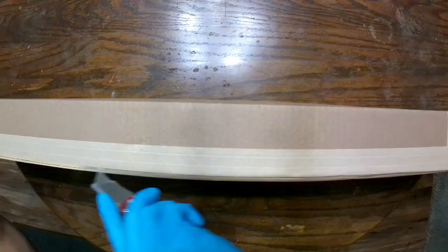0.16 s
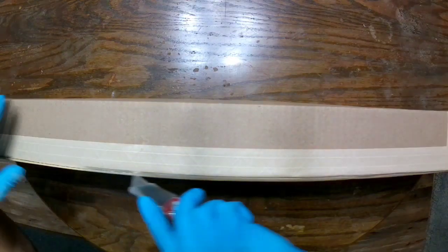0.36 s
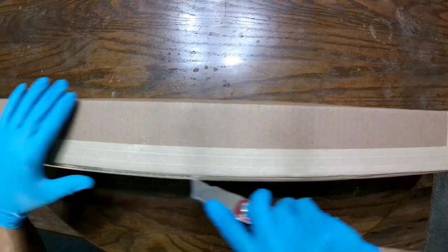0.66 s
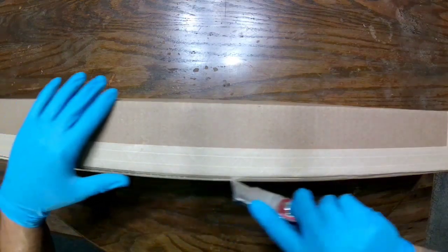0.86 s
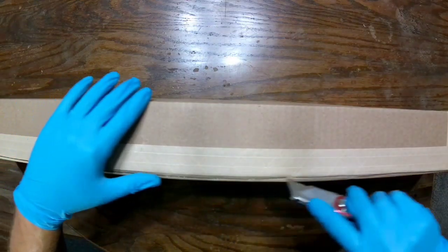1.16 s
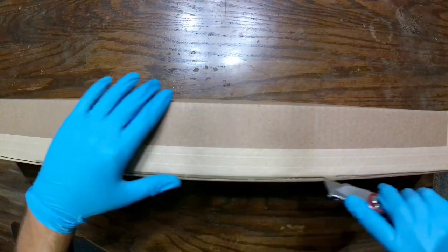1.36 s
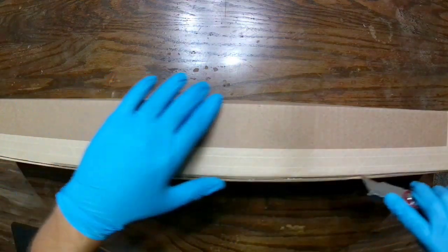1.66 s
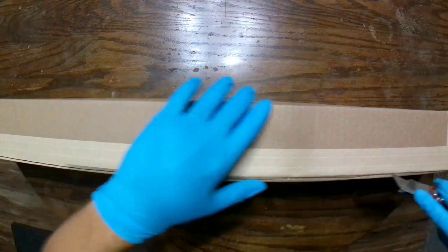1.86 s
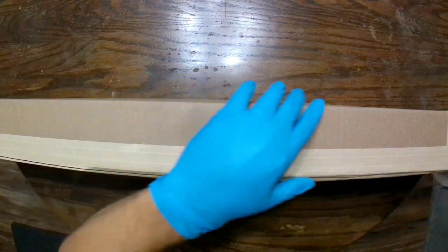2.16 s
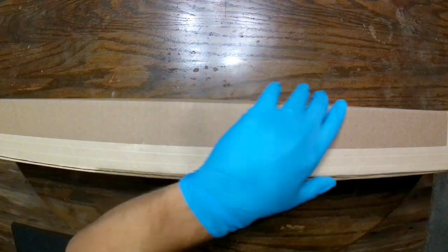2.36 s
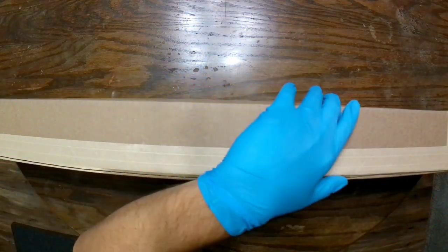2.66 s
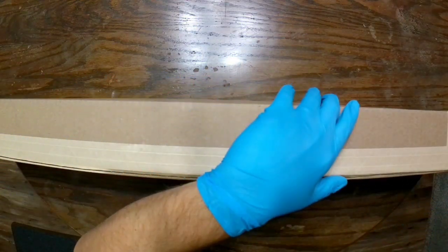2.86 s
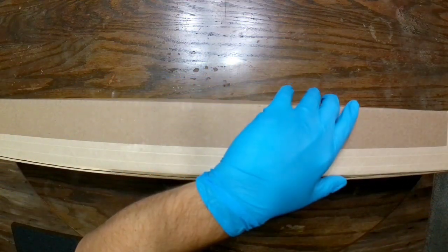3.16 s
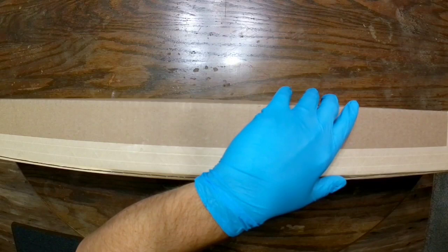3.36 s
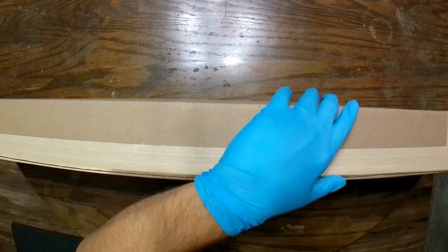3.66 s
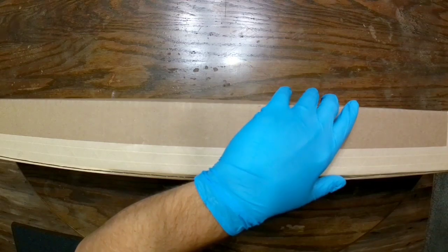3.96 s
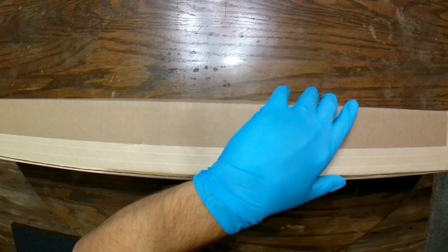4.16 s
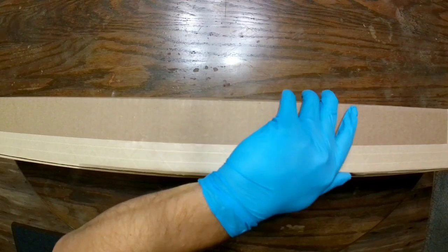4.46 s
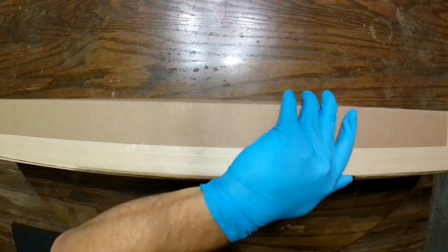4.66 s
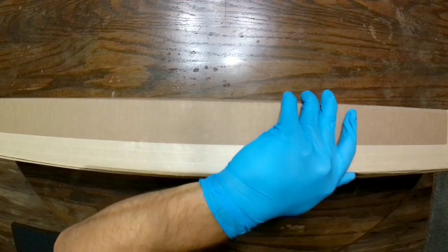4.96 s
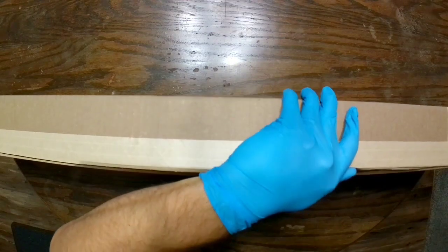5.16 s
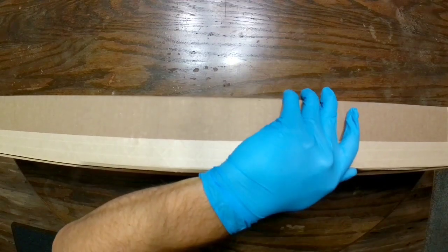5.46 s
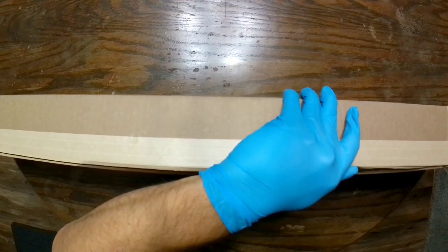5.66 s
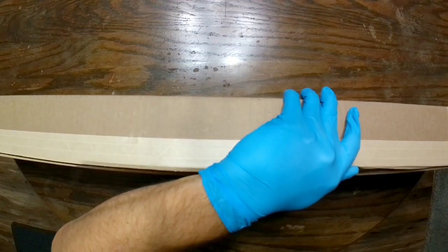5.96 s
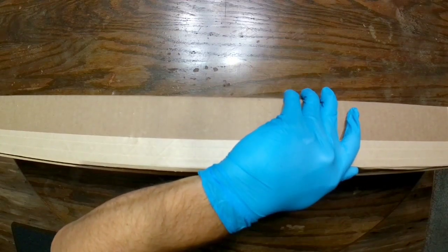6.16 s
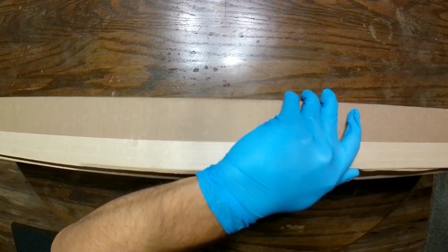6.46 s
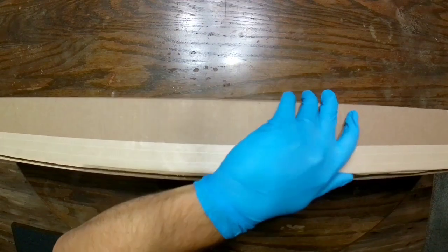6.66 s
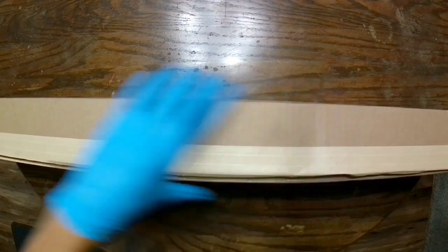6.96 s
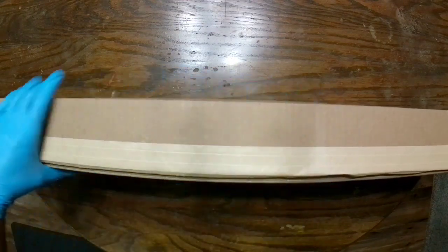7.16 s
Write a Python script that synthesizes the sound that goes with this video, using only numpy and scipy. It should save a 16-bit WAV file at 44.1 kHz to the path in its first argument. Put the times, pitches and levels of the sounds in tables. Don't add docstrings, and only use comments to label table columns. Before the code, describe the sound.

Close, gritty cardboard cutting with crackling tears for four seconds, then near quiet, two hard hollow box thumps and a short stuttering scrape on wood.

```python
import sys
import numpy as np
from scipy import signal
from scipy.fft import rfft, irfft, next_fast_len
from scipy.io import wavfile

SR = 44100
rng = np.random.default_rng(int(sys.argv[2]) if len(sys.argv) > 2 else 0)


def convert_level_to_amplitude(level_db):
    exponent = np.asarray(level_db, float) / 20
    return 10 ** exponent


def store_pcm(level_fs):
    pcm = np.round(np.clip(level_fs, -1, 1) * 32767).astype(np.int16)
    wavfile.write(sys.argv[1], SR, np.atleast_2d(pcm).T)


N = 321930

# (f/Hz, level/dB per Hz)
AIR_SPECTRUM = [(12, -42), (20, -2), (22, -24.5), (27, -22), (53, -17.5), (70, -18.5), (1120, -37.5),
                (1480, -41.5), (1910, -45.5), (2320, -49.5), (3340, -46.5), (4060, -47), (7310, -49.5),
                (14700, -53), (16000, -57)]
# (f/Hz, width/Hz, level/dB)
FAN_MODES = [(1540, 150, 0)]
# (f/Hz, t60/s)
ROOM_DECAY = [(100, 0.26), (500, 0.22), (1500, 0.31), (4000, 0.37), (10000, 0.22)]

PANEL_MODES = [(139.7, 19, 0.5), (209.5, 30.3, 1), (333.7, 33, -3), (385.7, 30.4, 0), (436, 51.6, 0.5),
               (551.5, 138, 2.5), (620, 184, -1)]
WALL_MODES = [(638, 37, -6), (724, 140, 4.5), (897, 124, 4), (1062, 108, 2), (1171, 154, 0),
              (1355, 185, -1), (1618, 287, 0), (1760, 717, -7)]
PAPER_MODES = [(2510, 470, 8), (3593, 210, 6.5), (5380, 1630, 10), (7600, 1200, -15.5), (9800, 1100, 3.5),
               (14260, 2400, -18)]
TABLE_MODES = [(60, 16, 0.0048), (90, 30, 0.021)]
THUD_MODES = [(430, 330, -1), (1000, 470, -6)]
SEAM_MODES = [(1580, 220, 6.5), (2585, 260, 7), (3950, 280, 2), (5870, 700, 1)]
FACE_MODES = [(1900, 490, 5.5), (3120, 1100, 1.5), (5230, 620, 3), (9900, 3100, -11.5)]
SOLE_MODES = [(990, 147, 5), (1246, 304, 0.5)]
KNIFE_MODES = [(1620, 320, 10.5), (1960, 950, 2.5), (3670, 150, 1), (5750, 300, -8), (9700, 530, -14)]
# (f/Hz, level/dB)
SKIN_RADIATION = [(8000, 0.5), (11200, -2.5), (11900, -19), (15000, -15)]

# (t/s, hiss peak level/dB, panel level/dB, relative wall level/dB)
CATCHES = [(.196, -29, -2, 5), (.2436, -26.5, -11, 0.5), (.2777, -33, -1, -10), (.3327, -23.5, -1.5, 2.5),
           (.3863, -24, 0.5, -1), (.417, -28, -7, 0), (.498, -24, -13, -4.5), (.5328, -25, -5, -10),
           (.616, -27, -3, -20), (.6808, -20, -8, -10), (.7086, -23.5, -1, -18), (.849, -28.5, -1, -5),
           (.888, -29.5, -4.5, -17), (1.0638, -26.5, -11, 6), (1.1872, -31, -12, 6), (1.2226, -30.5, 0, 0),
           (1.2481, -19.5, -5, -3), (1.2921, -23, -0.5, -7), (1.7938, -19.5, 0.8, -7),
           (1.8501, -22.5, -3, 5.5), (2.173, -28.5, -23, 10.5), (2.2741, -26, -33, -11),
           (2.2918, -20, -12, -21), (2.3472, -28, -20, -13), (2.3876, -20, -11, 1),
           (2.4649, -22.5, -5.5, -10), (2.6485, -25.5, -0.5, -15), (2.7536, -30.5, -3.5, -16),
           (2.9307, -29.5, 0.5, -12), (3.1643, -22, -2.5, -1)]
# (t/s, hiss peak level/dB, panel level/dB, relative
# wall level/dB)
TICKS = [(1.533, -42, 12.5, -19), (1.7204, -57, -7, 35), (2.14, -37, 6, 8), (2.3065, -32.5, -17, 4.5),
         (2.4047, -30, -7, -1), (2.7066, -30, -7, -24), (2.7302, -31.5, -1, -8), (2.886, -36.5, 0, -12),
         (3.054, -65, 22, -6), (3.1548, -30.5, -20, 0), (3.3836, -45.5, 5, 12), (3.4559, -36, 5.5, 3.5),
         (3.606, -52, 12.5, 20), (3.7533, -35.5, -6, 9), (3.8487, -36, 4.5, 10), (3.984, -39, -5, -4),
         (4.0093, -26, 5.5, 10.5), (4.014, -24, 1.5, -8), (4.373, -45.5, 4, 9), (4.7184, -57, 9, 13),
         (4.957, -49, 0.5, 3), (4.9872, -51, -5, 7), (5.079, -52.5, 1, 5), (5.164, -47.5, -11, -3),
         (5.4916, -51.5, -6.5, -2), (5.684, -54.5, -4, 5), (5.741, -63, 12, -1), (6.5174, -49, -12, -3),
         (6.539, -45, -1, 17), (6.7542, -56.5, -3, 19.5)]
# (t/s, hiss peak level/dB, panel level/dB, relative wall level/dB, t60/s)
SWELLS = [
    (1.6897, -37.5, 0.5, -6, 0.16),
    (3.9979, -27.5, 2.5, 13, 0.069),
    (4.2139, -38, -24, -7, 0.12),
    (4.4744, -50, -3, 6.5, 0.18),
    (4.5591, -62, 7.5, 18.5, 0.13),
    (5.8988, -49, 5, 7.5, 0.15),
    (5.964, -34.5, -18.5, -12, .16),
    (6.246, -45, -18, -11.5, 0.18),
    (6.515, -51, -12, -11, 0.24),
    (6.5793, -38.5, 3.5, -8, 0.11),
]
# (t/s, blow level/dB, contact/s, panel level/dB, table level/dB)
KNOCKS = [
    (4.3822, -29.5, 0.00027, 12, 6.5),
    (5.9608, -12.5, 0.0007, 10, -17),
    (6.2384, -12, 0.00095, 3.5, -7),
]
# (t/s, level/dB)
DRAG_LEVEL = [
    (6.329, -33.5),
    (6.39, -36),
    (6.425, -32),
    (6.491, -33),
    (6.505, -59),
    (6.535, -50.5),
    (6.56, -31.5),
    (6.59, -59),
    (6.619, -64),
]
# (t/s, pressure level/dB, tearing level over it/dB, panel f/Hz under the contact)
BLADE_PATH = [(0, -36.5, -15.5, 510), (.4, -42, -7.5, 520), (.7, -32.5, -16.5, 430), (1.12, -34, -15, 343),
              (1.26, -36.5, -7, 400), (1.66, -39, -16.5, 433), (1.75, -32, -8, 238),
              (1.87, -34, -15.5, 300), (1.99, -38.5, -15, 436), (2.06, -33, -16, 373),
              (2.25, -34, -9.5, 402), (2.38, -32, -14.5, 430), (2.46, -38.5, -11.5, 360),
              (3.25, -36, -17.5, 376), (3.32, -46, -19.5, 280), (3.6, -36.5, -14.5, 380),
              (3.8, -41, -20.5, 455), (3.98, -36, -13.5, 325)]
# (t/s, pressure level/dB, tearing level over it/dB, panel f/Hz under the contact)
GLOVE_PATH = [(4.11, -65.5, 2, 217), (4.41, -50.5, -14, 365), (4.63, -73.5, 5, 220), (4.86, -57, -15, 215),
              (5.37, -83, -9, 200), (5.85, -64, -21, 200), (5.94, -39.5, -46, 414), (6.1, -42.5, -18, 330),
              (6.22, -41, -15.5, 368), (6.28, -27.5, -15, 330), (6.4, -40.5, -22, 357),
              (6.57, -43, -1.5, 237), (6.69, -62.5, -14, 185), (6.79, -51.5, -11, 287),
              (6.95, -76, 9.5, 170), (7.07, -68, 10, 231), (7.2, -55.5, 1.5, 257), (7.3, -35, -29, 275)]

CUT_END_S, GLOVES_START_S = BLADE_PATH[-1][0], GLOVE_PATH[0][0]
WALL_TEAR = 0.4
BLADE_WALL_DB, BLADE_WALL_HZ, GLOVE_WALL_DB, GLOVE_WALL_HZ = -1, 972, 1.5, 1134
WALL_DB_PER_S = 0.52
SEAM_START_HZ, SEAM_END_HZ = 3520, 4440
GLOVE_PAPER_HZ, TEAR_OCTAVES_PER_DB = 4200, -3.85
TABLE_DB, TABLE_GROWS, TABLE_DB_PER_OCTAVE = -60.5, 0.54, 17.5
FAVOUR_DB, WANDER_OCTAVES = 4.5, 0.043
CATCH_T60, CATCH_RISE = 0.023, 0.001
TICK_T60, TICK_RISE, SWELL_RISE = 0.04, 0.0028, 0.011
KNOCK_WALL_DB = 9
CRACK_DB, CRACK_DB_PER_CONTACT, CRACK_CONTACT_S = -19, 17.5, 0.00083
SEAM_DB, SEAM_SLACK_S, SEAM_SLACK_DB = -0.5, 1.03, -13.5
SEAM_CATCH_DB, CRACKLE_SHARE, CRACKLE_T60 = -2.5, 0.85, 0.009
KNIFE_DB = -3.5
SCUFF_DB, SCUFF_TOP_HZ = -14, 5000
OFFSET, CLIP = -0.0048, 0.93


def unit(x):
    return x / np.sqrt(np.mean(x ** 2) + 1e-20)


def along(points, hz):
    f, v = np.transpose(points)
    return np.interp(np.log(hz + 1), np.log(f + 1), v)


def filtered(x, response):
    m = next_fast_len(N + SR // 2)
    return irfft(rfft(x, m) * response(np.fft.rfftfreq(m, 1 / SR)), m)[..., :N]


def wobble(rate):
    knots = int(N * rate // SR + 2)
    return np.interp(np.arange(N) * rate / SR, np.arange(knots), rng.standard_normal(knots))


def ringing(x, modes, favoured_hz=None, favour_db=0, octaves=0.2, patchy_db=0):
    m = next_fast_len(N + SR // 2)
    f = np.fft.rfftfreq(m, 1 / SR)
    shapes = []
    for k, (centre, width, db) in enumerate(modes):
        damping = 1j * f * width
        shapes.append((-1) ** k * convert_level_to_amplitude(db) * damping / (centre * centre - f * f + damping))
    shapes = np.array(shapes)
    shapes = shapes / np.sqrt(np.mean(abs(shapes.sum(axis=0)) ** 2))
    if favoured_hz is not None:
        away = np.log2(np.array(modes)[:, :1] / favoured_hz) / octaves
        flicker_db = patchy_db * np.array([wobble(45) for _ in modes])
        x = x * convert_level_to_amplitude(favour_db * (np.exp(-away ** 2 / 2) - 0.5) + flicker_db)
    return irfft((rfft(x, m) * shapes).sum(axis=0), m)[:N]


def slips(rate, spread_db, t60, rise):
    sizes = convert_level_to_amplitude(spread_db * np.minimum(rng.exponential(size=N), 2))
    starts = (rng.random(N) < rate / SR) * sizes
    fading = signal.lfilter([1], [1, -convert_level_to_amplitude(-60 / (t60 * SR))], starts)
    return unit(signal.lfilter([1], [1, -np.exp(-1 / (rise * SR))], fading))


def air():
    noise = rng.standard_normal(N)
    tone = unit(filtered(noise, lambda hz: convert_level_to_amplitude(along(AIR_SPECTRUM, hz)) * (hz > 12)))
    whine = convert_level_to_amplitude(-10 + 4.8 * wobble(6)) * ringing(rng.standard_normal(N), FAN_MODES)
    return convert_level_to_amplitude(-57.5) * (tone + whine)


def room(x):
    hop = SR // 4
    out, padded = np.zeros(N + 2 * SR), np.pad(x, (hop, 2 * hop))
    window = np.sin(np.pi * np.arange(2 * hop) / (2 * hop))
    for start in range(0, N + hop, hop):
        hz, t, z = signal.stft(rng.standard_normal(SR * 2 // 5), SR, nperseg=256)
        decay = convert_level_to_amplitude(-60 * t / along(ROOM_DECAY, hz)[:, None])
        tail = signal.istft(z * decay, SR, nperseg=256)[1]
        piece = signal.fftconvolve(padded[start:start + 2 * hop] * window, tail / np.linalg.norm(tail))
        out[start:start + len(piece)] += piece
    return out[hop - 300:][:N]


def knife():
    s, db = KNOCKS[0][:2]
    impulse = np.arange(N) == round(s * SR)
    return ringing(convert_level_to_amplitude(db + KNIFE_DB + 22.5) * impulse, KNIFE_MODES)


def drag():
    s, db = np.transpose(DRAG_LEVEL)
    cycles = np.cumsum(58 + 7 * wobble(26)) / SR
    chatter = unit(0.17 + convert_level_to_amplitude(-20 * (cycles % 1)))
    level = convert_level_to_amplitude(np.interp(np.arange(N) / SR, s, db, -120, -120) - 0.5)
    edge_force, face_force = level * chatter * rng.standard_normal((2, N))
    squeak = ringing(edge_force, SOLE_MODES, favoured_hz=1100, patchy_db=2)
    scuff = convert_level_to_amplitude(SCUFF_DB) * ringing(face_force, FACE_MODES[:3])
    return filtered(squeak + scuff, lambda hz: 1 / (1 + 1j * hz / SCUFF_TOP_HZ) ** 2)


def knocks():
    force, thud = np.zeros((4, N)), np.zeros(N)
    t = np.arange(SR // 3) / SR
    fade = convert_level_to_amplitude(-60 * t / 0.016) + convert_level_to_amplitude(-23 - 60 * t / 0.13)
    for s, db, touch_s, panel_db, table_db in KNOCKS:
        blow = convert_level_to_amplitude(db) * np.sin(np.pi * np.clip(t / touch_s, 0, 1)) ** 2
        crack_db = db + CRACK_DB + CRACK_DB_PER_CONTACT * touch_s / CRACK_CONTACT_S
        crack = convert_level_to_amplitude(crack_db) * fade * rng.standard_normal(len(t))
        start = round(s * SR)
        span = slice(start, start + len(t))
        force[:, span] += [convert_level_to_amplitude(panel_db) * blow, convert_level_to_amplitude(KNOCK_WALL_DB) * blow, crack, convert_level_to_amplitude(table_db) * blow]
        thud[span] += convert_level_to_amplitude(9) * blow
    return force, thud


def contact():
    s, press_db, tear_db, panel_hz = np.transpose(BLADE_PATH + GLOVE_PATH)
    blade = s <= CUT_END_S
    wall_offset_db = np.where(blade, BLADE_WALL_DB + WALL_DB_PER_S * (s - 2), GLOVE_WALL_DB)
    wall_db = press_db + WALL_TEAR * tear_db + wall_offset_db
    depth_octaves = np.log2(350 / panel_hz)
    table_db = TABLE_DB + TABLE_GROWS * (press_db + 40) + TABLE_DB_PER_OCTAVE * depth_octaves
    seam_hz = SEAM_START_HZ + (SEAM_END_HZ - SEAM_START_HZ) * s / CUT_END_S
    paper_hz = np.where(blade, seam_hz, GLOVE_PAPER_HZ * 2 ** (TEAR_OCTAVES_PER_DB * tear_db))
    wall_hz = np.where(blade, BLADE_WALL_HZ, GLOVE_WALL_HZ)

    def smooth(*columns):
        return np.array([np.interp(np.arange(N) / SR, s, c) for c in columns])

    stray = 2 ** (WANDER_OCTAVES * np.array([wobble(9.6) for _ in range(3)]))
    levels = smooth(press_db, wall_db, press_db + tear_db, table_db)
    return levels, stray * smooth(panel_hz, wall_hz, paper_hz)


def rubbing(level_db):
    grain = slips(rate=380, spread_db=7.5, t60=0.0084, rise=0.0016)
    snaps = slips(rate=110, spread_db=5.5, t60=0.031, rise=0.0004)
    share = np.array([[0.4], [0.45], [0.5], [0.2]])
    cutting = np.arange(N) / SR < GLOVES_START_S
    crisp = np.array([[0.05], [0.25], [0.3], [0]]) * cutting
    own_db = np.array([wobble(25) for _ in level_db])
    force = share * grain + crisp * snaps + 1 - share
    return convert_level_to_amplitude(level_db - 2 + own_db) * force * rng.standard_normal(level_db.shape)


def catches():
    force = np.zeros((4, N + SR))
    events = [(*c, CATCH_T60, CATCH_RISE) for c in CATCHES]
    events += [(*c, TICK_T60, TICK_RISE) for c in TICKS]
    events += [(*c, SWELL_RISE) for c in SWELLS]
    for s, db, panel_db, wall_db, t60, rise in events:
        t = np.arange(round(t60 * SR)) / SR
        shape = convert_level_to_amplitude(db - 60 * t / t60) * (1 - np.exp(-t / rise))
        start = round((s - 0.0015) * SR)
        gain = convert_level_to_amplitude([[panel_db + 16], [wall_db + 3], [-1]])
        force[:3, start:start + len(t)] += gain * shape * rng.standard_normal((3, len(t)))
    return force[:, :N]


def seam(tear_db, catch):
    t = np.arange(N) / SR
    slack_db = SEAM_SLACK_DB / (1 + np.exp((SEAM_SLACK_S - t) / 0.12))
    taut = convert_level_to_amplitude(SEAM_DB + slack_db) * (t < GLOVES_START_S)
    releases = np.array([slips(rate=170, spread_db=8, t60=CRACKLE_T60, rise=0.00063) for _ in SEAM_MODES])
    crackle = CRACKLE_SHARE * releases + 1 - CRACKLE_SHARE
    fibres = convert_level_to_amplitude(tear_db) * crackle * rng.standard_normal((len(SEAM_MODES), N))
    return ringing(taut * (fibres + convert_level_to_amplitude(SEAM_CATCH_DB) * catch), SEAM_MODES)


def box():
    level_db, (panel_hz, wall_hz, paper_hz) = contact()
    (panel_blow, wall_blow, crack, table_blow), push = knocks()
    tears = catches()
    panel, wall, paper, table = rubbing(level_db) + convert_level_to_amplitude([[-7], [-2], [0], [0]]) * tears
    face = ringing(crack, FACE_MODES)
    thud = ringing(push + convert_level_to_amplitude(-11) * tears[0], THUD_MODES) + convert_level_to_amplitude(-11) * face
    body = ringing(panel + panel_blow, PANEL_MODES, panel_hz, FAVOUR_DB, patchy_db=-0.15)
    body += ringing(wall + wall_blow, WALL_MODES, wall_hz, FAVOUR_DB, patchy_db=1.95)
    skin = ringing(paper, PAPER_MODES, paper_hz, favour_db=6.5, octaves=0.15, patchy_db=1.84)
    skin = filtered(skin + convert_level_to_amplitude(-3.5) * face, lambda hz: convert_level_to_amplitude(along(SKIN_RADIATION, hz)))
    boards = ringing(table + table_blow, TABLE_MODES)
    return thud, body + skin + boards + seam(level_db[2], tears[2]) + knife() + drag()


def scene():
    thud, near = box()
    reverberation = convert_level_to_amplitude(-6.5) * room(near + convert_level_to_amplitude(-23.5) * thud)
    return (near + thud + reverberation + air())[None]


def low_pass(x):
    return signal.sosfilt(signal.butter(12, 16470, fs=SR, output="sos"), x)


def record(dry):
    clipped = dry / (1 + abs(dry / CLIP) ** 7) ** (1 / 7)
    rolloff = [(15700, -2.5), (15900, -30.5), (16400, -36), (16500, -91)]  # (f/Hz, level/dB)
    band = filtered(clipped, lambda hz: convert_level_to_amplitude(along(rolloff, hz)))
    return low_pass(band + OFFSET)


dry = scene()
out = record(dry)
store_pcm(out)
```